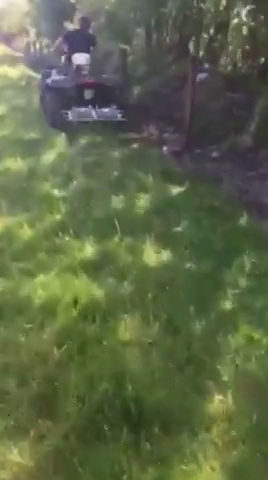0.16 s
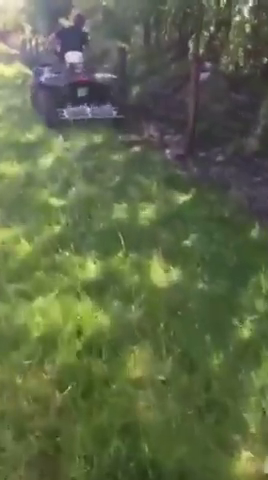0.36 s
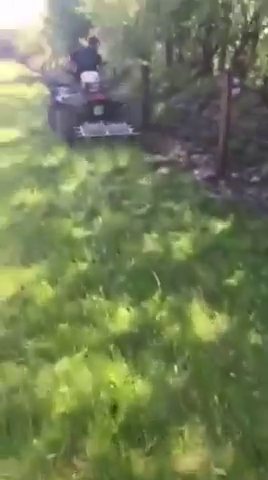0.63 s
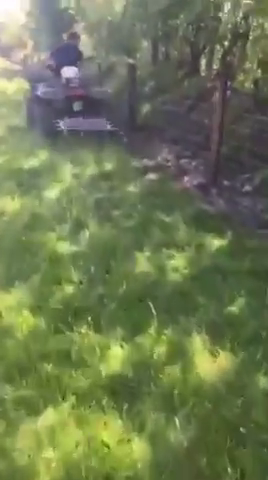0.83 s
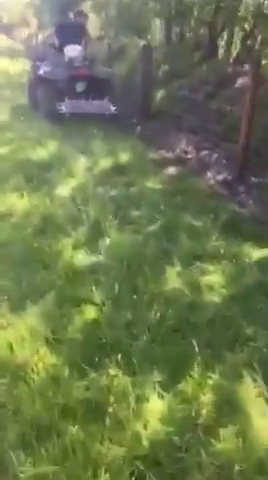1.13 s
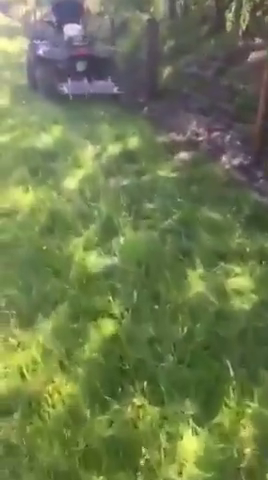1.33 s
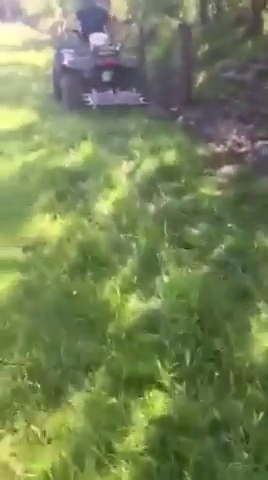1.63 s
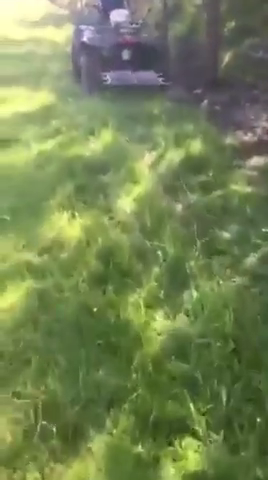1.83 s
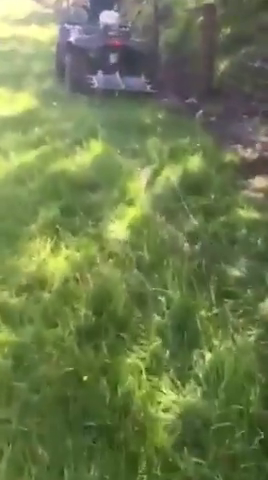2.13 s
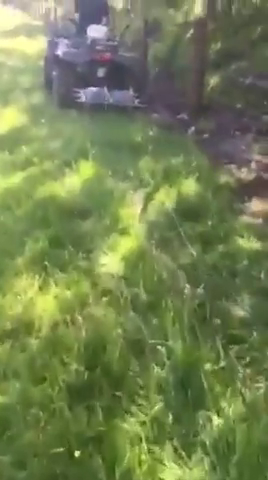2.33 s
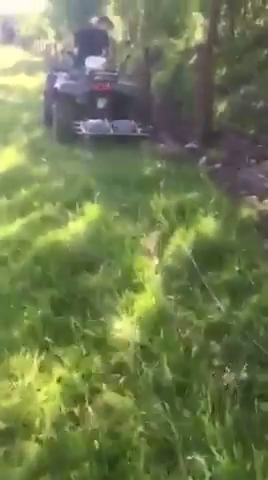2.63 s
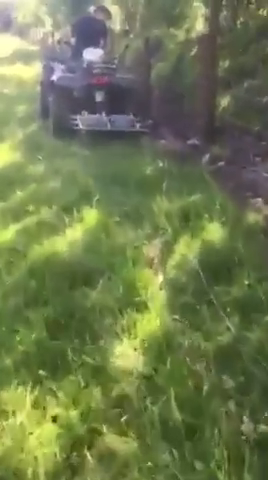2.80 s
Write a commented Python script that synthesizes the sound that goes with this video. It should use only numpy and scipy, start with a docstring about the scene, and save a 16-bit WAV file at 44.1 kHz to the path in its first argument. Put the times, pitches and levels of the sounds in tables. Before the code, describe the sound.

Outdoors, a single-cylinder quad bike drops from a buzzing drone to a loping idle and picks up a little near the end. Its loose steel frame clatters on bumps, with soft wind rumble; mono, dull above the mid-treble.

```python
"""A single-cylinder four-stroke quad bike slows to an uneven idle in a field, then picks up a little.
Each exhaust stroke sings in the pipe and sets silencer modes booming and bark modes ringing; at speed
the strokes merge into a drone, a sum of orders of the firing rate. A steel frame rattles in bursts as
jolts send swarms of touches into its modes, with two echoes; wind and hiss of filtered noise lie below."""
import sys
import numpy as np
from scipy import signal
from scipy.io import wavfile
from scipy.ndimage import uniform_filter1d

SR = 44100
rng = np.random.default_rng(int(sys.argv[2]) if len(sys.argv) > 2 else 0)


def voltage_ratio(level):
    """Linear amplitude factor for a level in decibels (scalar or array-like)."""
    return 10 ** (np.asarray(level, float) / 20)


def unload_wav(signal):
    """Save mono or channel-first audio to the path in sys.argv[1] as 16-bit WAV at rate SR, clipped to [-1, 1]."""
    wavfile.write(
        sys.argv[1],
        SR,
        np.round(np.clip(np.atleast_2d(signal).T, -1, 1) * 32767).astype(np.int16),
    )


N = 130536

# Firing rate of the engine: (time [s], firing rate [firings per s])
FIRING_RATE = [(0.0, 19.5), (0.2, 18.5), (0.3, 17.53), (0.42, 17.03), (0.62, 17.89), (0.8, 16.23),
               (1.05, 14.66), (1.3, 11.97), (1.45, 10.33), (1.75, 9.87), (2.0, 8.72), (2.2, 7.58),
               (2.45, 9.13), (2.65, 11.01), (2.96, 12.0)]
# Jolts of the frame, sudden or swelling; treble and low are relative to the peak:
# (time [s], relative peak [dB], rise [s], fall t60 [s], treble before a common 3 dB lift [dB], low [dB])
FRAME_JOLTS = [(.0014,-20.5,0.0053,0.54,-8.5,3),(0.0732,-20.5,0.0054,0.68,-5,3.5),(0.0936,-14.5,.011,0.32,-11,1),(0.1514,-16.5,0.022,0.07,-17,2.5),
               (0.1914,-21.5,0.009,0.25,-6.5,2),(0.2332,-19,.018,.38,-5,-1),(0.2822,-18.5,0.0027,0.4,-6,6),(0.3713,-13,0.0044,0.32,-7,1),
               (.3844,-23,.0085,0.27,-8.5,0),(.4294,-16.5,0.035,0.77,-12,-0.5),(0.4778,-25,0.063,.1,0,0),(0.5267,-19.5,0.0056,0.086,-14,-3),
               (0.6772,-12.5,0.003,.1,-6,-4),(0.682,-9.5,0.021,0.31,-4.5,0.5),(0.8258,-16.5,0.0048,0.26,-7,2.5),(0.8424,-16.5,0.012,0.37,-10,0),
               (0.9446,-22,0.0049,.6,-13,0),(0.9816,-11.5,0.0064,0.14,-10.5,-4.5),(1.0054,-13,0.012,0.3,-7,1.5),(1.0374,-21,0.014,0.23,-4,0.5),
               (1.0705,-27,0.02,0.54,-7,-4),(1.1486,-24,0.012,0.68,-13,-2.5),(1.1974,-24,0.011,0.71,-8,-0.5),(1.2274,-20.5,0.0059,0.38,-7.5,0.5),
               (1.2983,-23,.011,.73,-6.5,-3.5),(1.378,-20,0.014,0.17,-8.5,4),(1.3922,-15.5,0.0062,0.13,-4.5,-6),(1.441,-23.5,0.028,0.54,-9,-7),
               (1.5006,-16,.008,0.23,-4.5,2.5),(1.5202,-17.5,0.007,0.43,-10.5,2),(1.643,-20,0.023,0.4,-11,-1),(1.8329,-32,0.0072,0.42,-17.5,8),
               (1.9217,-32.5,0.0069,1,-9.5,3),(1.9544,-27.5,0.02,0.26,-25,1.5),(2.048,-21,0.0072,0.63,-13,1),(2.063,-14,0.024,0.37,-11,-4),
               (2.1068,-8.5,0.014,0.13,-8,-2.5),(2.1694,-26.5,0.021,0.27,-14,1),(2.215,-24.5,0.018,0.045,-9,0.5),(2.3152,-31,0.0049,0.13,-16,7.5),
               (2.3448,-29.5,0.0029,0.32,-17,5),(2.4336,-31.5,.004,0.2,-15.5,7),(2.4635,-21,0.0019,0.064,-23.5,-2),(2.5128,-32.5,0.0037,0.17,-13.5,4.5),
               (2.5387,-27,0.0049,0.15,-18.5,0.5),(2.5593,-28.5,.004,0.44,-12.5,-2),(2.6316,-28,0.01,0.75,-12,3.5),(2.6855,-20,0.0058,.1,-3.5,-1.5),
               (2.6987,-22,0.025,.2,-10,1.5),(2.8063,-33.5,0.0028,.12,-11,6),(2.8285,-21,0.0032,0.055,-21,-5),(2.9002,-28.5,0.0032,0.076,-15.5,7.5),
               (2.9223,-24.5,0.0045,0.075,-16.5,2)]
VALVE_OPENS = -0.4  # share of a cycle, from the firing count's whole numbers


def rms_one(x):
    """Normalisation to unit mean power: scale to rms 1."""
    return x / np.sqrt(np.mean(x ** 2) + 1e-20)


def in_time(rows):
    """Linear interpolation in time: columns of a curve, one value per sample."""
    s, *columns = np.transpose(rows)
    return [np.interp(np.arange(N) / SR, s, c) for c in columns]


def at_hz(points, hz):
    """Interpolation of a level spectrum on a logarithmic frequency axis."""
    point_hz, point_db = np.transpose(points)
    return np.interp(np.log(hz), np.log(point_hz), point_db)


def drift(corner_hz):
    """Low-passed Gaussian noise: two equal poles leave a slow fluctuation of spread 1."""
    pole = np.exp(-2 * np.pi * corner_hz * 40 / SR)  # one value every 40 samples
    noise = rng.standard_normal(N // 40 + 2002)
    slow = signal.lfilter([1], [1, -2 * pole, pole ** 2], noise)[2000:]  # settled part
    return np.interp(np.arange(N) / 40, np.arange(len(slow)), rms_one(slow))


def ring(clicks, hz, t60):
    """Impulse response of a damped resonator: a unit click starts a decaying sine of initial height 1."""
    r, w = voltage_ratio(-60 / (t60 * SR)), 2 * np.pi * hz / SR
    return signal.lfilter([0, np.sin(w)], [1, -2 * r * np.cos(w), r * r], clicks + 1e-18)


def engine(firing_hz):
    """Source and resonator: each stroke excites pipe, silencer and bark modes, over the orders' drone."""
    # Exhaust course; boom level and pipe note are read once a firing, bark level runs on continuously:
    # (time [s], boom level [dB], bark level [dB], pipe note [Hz])
    exhaust = [(0, -41, -41, 72.2), (.08, -38.5, -36.5, 75.3), (.3, -40, -40.5, 67.4),
               (.56, -45, -42, 69.2), (.8, -40, -47, 63.4), (1.085, -37, -40, 60.4),
               (1.16, -47.5, -44.5, 57), (1.316, -45, -42.5, 72), (1.405, -29, -43.5, 88.1),
               (1.5, -32.5, -40, 90), (1.6, -47.5, -42, 81.3), (1.7, -33.5, -45, 76), (1.8, -45.5, -55, 86),
               (1.908, -28, -40, 76), (2.017, -28.5, -44.5, 84.1), (2.14, -44.5, -49.5, 90),
               (2.27, -38.5, -64.5, 81.7), (2.39, -26.5, -43.5, 78.7), (2.5, -24, -40, 81.5),
               (2.6, -25, -42.5, 89.8), (2.69, -28.5, -42.5, 86.4), (2.78, -28, -40, 82),
               (2.863, -31, -42.5, 90), (2.95, -30.5, -39.5, 90)]
    boom_db, bark_db, pipe_hz = in_time(exhaust)
    cycles = 0.36 + np.cumsum(firing_hz) / SR
    luck = rng.standard_normal((64, 20))  # one row a stroke
    turn = np.floor(cycles - VALVE_OPENS).astype(int)
    fired = np.minimum(np.searchsorted(cycles, turn), N - 1)
    boom_db = uniform_filter1d(boom_db[fired], size=300)
    share, sings, valve = exhaust_valve(cycles, turn, firing_hz)
    pipe = exhaust_pipe(turn, share / sings, valve, boom_db, pipe_hz[fired], luck)
    boom = voltage_ratio(-3) * pipe + silencer(cycles, firing_hz, luck)
    return voltage_ratio(boom_db) * rms_one(boom) + voltage_ratio(bark_db) * bark(cycles, valve, luck) + drone(cycles)


def exhaust_valve(cycles, turn, firing_hz):
    """Periodic gating: the singing time is constant at idle and a fixed share of the cycle at speed."""
    edge = 0.16  # share of a cycle to open or shut
    share = cycles - VALVE_OPENS - turn
    sings = np.minimum(0.053 * firing_hz, 0.68)  # 0.053 s, at most 0.68 of a cycle
    nearest_edge = np.minimum(share, sings + edge - share)
    valve = np.sin(np.pi / 2 * np.clip(nearest_edge / edge, 0, 1)) ** 2
    return share, sings, valve


def exhaust_pipe(turn, progress, valve, boom_db, pipe_hz, luck):
    """Forced and free vibration: a tone and its octave sing under the open valve, and a mode rings on."""
    uneven_db, swell_db, overtone_db = 1, 8, -12.5
    phase = np.cumsum(pipe_hz) / SR
    opening = np.diff(turn, prepend=-1) > 0
    opened = np.maximum.accumulate(np.where(opening, phase, 0))
    angle = 2 * np.pi * (phase - opened)  # restarts at each opening
    tone = np.sin(angle) - voltage_ratio(overtone_db) * np.cos(2 * angle)
    pipe = valve * voltage_ratio(uneven_db * luck[turn, 0] + swell_db * progress) * tone
    # the drive carries the boom level, so the tail keeps the strength of its own stroke
    ring_on = ring(pipe * voltage_ratio(boom_db), 86, 0.34) / voltage_ratio(boom_db)
    return pipe + voltage_ratio(-11.5) * np.std(pipe) * rms_one(ring_on)


def stroke_pulses(cycles, at, stroke_luck):
    """Impulsive excitation: one click a cycle at a given share of it, its height spread by 2 dB."""
    turn = np.floor(cycles - at).astype(int)
    return np.diff(turn, prepend=turn[0]) * voltage_ratio(2 * stroke_luck[turn + 2])


def silencer(cycles, firing_hz, luck):
    """Modal superposition: the opening valve strikes low resonances, which boom more at speed."""
    # Silencer modes: (frequency [Hz], relative level [dB], t60 [s])
    silencer_modes = [(51, 7, 0.28), (42.4, -6, 0.17), (90, 9.5, 0.25)]
    out = 0
    for k, (hz, db, t60) in enumerate(silencer_modes):
        out = out + voltage_ratio(db) * ring(stroke_pulses(cycles, VALVE_OPENS, luck[:, 1 + k]), hz, t60)
    return out * voltage_ratio(1.53 * (firing_hz - 16.5))  # dB per firing Hz


def bark(cycles, valve, luck):
    """Modal superposition: a pulse, an inverted afterpulse and gas noise excite brighter modes; rms 1."""
    # Bark modes: (frequency [Hz], relative level [dB], t60 [s])
    bark_modes = [(138.4, 1.5, 0.06), (185.6, 5.5, 0.074), (239, -15, 0.03), (273.3, -6.5, 0.052),
                  (294, -10.5, 0.044), (418.7, -9.5, 0.099), (593, -16, 0.069), (666.6, -5.5, 0.11)]
    starts, stagger, after_at = -0.118, 0.02013, 0.4  # shares of a cycle; stagger is between modes
    gas = voltage_ratio(-9) * rng.standard_normal(N) * np.sqrt(12 / SR) * (valve + 0.3)
    out = 0
    for k, (hz, db, t60) in enumerate(bark_modes):
        first = stroke_pulses(cycles, starts + stagger * k, luck[:, 4 + k])
        after = voltage_ratio(-3.5) * stroke_pulses(cycles, after_at, luck[:, 12 + k])
        out = out + (-1) ** k * voltage_ratio(db) * ring(first - after + gas, hz, t60)
    return rms_one(signal.sosfilt(signal.butter(2, 375, fs=SR, output="sos"), out))


def drone(cycles):
    """Fourier synthesis: orders of the firing rate, each wavering a little in level and phase."""
    # Orders {multiple of the firing rate: rms before the level course [dB]}
    orders = {3: -33, 4: -36, 5: -39.5, 6: -51.5, 7: -41, 8: -43.5, 9: -48, 10: -46.5, 11: -37, 12: -44, 13:
              -49.5, 14: -48, 15: -41.5, 16: -45, 17: -54.5, 18: -54.5, 19: -57}
    # Level course: (time [s], third order [dB], fourth and fifth [dB], higher orders [dB])
    course = [(0, 0, 0, -0.5), (.3, -4, 2, 0), (.42, 1.5, 2.5, 0), (.53, -15, 9, 1.5), (.65, 1, 4, 1),
              (.76, -10, 0, -1), (.89, -4.5, 3.5, -2.5), (1.02, -8.5, 0, -5), (1.16, -13, -20, -14.5),
              (1.3, -20, -17, -15), (1.5, -39, -37, -37)]
    # Silencer resonances turn these orders ahead of the stroke: {order: phase lead [rad]}
    lead = {3: 1, 5: 2.2, 10: 1, 12: .6, 13: 4, 16: 1}
    levels = in_time(course)
    out = 0
    for k, db in orders.items():
        level_db = db + levels[min(k // 2 - 1, 2)] + 1.2 * drift(10)
        phase = 2 * np.pi * k * cycles - 2.1 + lead.get(k, 0) + 0.15 * drift(7.4)
        out = out + np.sqrt(2) * voltage_ratio(level_db) * np.cos(phase)
    return out


def jolt_envelopes():
    """Energy addition: powers of linear rises and exponential falls add; sudden jolts also click."""
    t = np.arange(N) / SR
    shake, treble, low, first = np.zeros((4, N))
    for s, db, rise, fall, treble_db, low_db in FRAME_JOLTS:
        since = np.maximum(t - s, 0)
        shape = voltage_ratio(db) * np.minimum(since / rise, 1) * voltage_ratio(-60 * np.maximum(since - rise, 0) / fall)
        shake = shake + shape ** 2
        treble = treble + (shape * voltage_ratio(treble_db)) ** 2
        low = low + (shape * voltage_ratio(low_db)) ** 2
        first[int(s * SR) + 20] = voltage_ratio(6 + db) * (rise < 0.012)
    return shake, 2 * treble, low, first


def loose_touches():
    """Random point process: about 1800 touches per s, clumped, of uneven size and random sign."""
    spread_db = 4.5 * np.minimum(rng.exponential(1, N), 3)
    sizes = voltage_ratio(spread_db) * rng.choice([-1, 1], N)
    touches = sizes * (rng.random(N) < 1800 * voltage_ratio(2.5 * drift(40)) / SR)
    # the power of 1000 unit touches per s
    return touches / np.sqrt(np.mean(touches ** 2) * SR / 1000), np.sign(sizes)


def frame_modes():
    """Modal density: a few frame modes stand among 70 log-spaced small ones shaped to a spectrum."""
    # Ringing parts of the frame: (frequency [Hz], t60 [s], relative level [dB])
    parts = [(1136,0.058,-6.5),(1626,0.092,-2),(2480,0.21,-8.5),(2604,0.11,4),(2896,0.081,-1),(3372,0.26,-3),(4690,0.067,4),
             (4924,0.085,10),(5350,0.079,3),(5760,0.16,2.5),(5800,.08,3.5),(6060,0.11,-7.5),(7050,0.14,6),(7330,.06,6.5)]
    # Spectrum of many small loose parts: (frequency [Hz], relative level [dB per Hz])
    links = [(350, -42), (600, -22.5), (1120, -9.5), (1630, -9.5), (2280, -10), (2980, -2), (3550, -9.5),
             (5130, -4), (7100, -4), (8000, 1), (10400, -48.5), (17600, -120)]
    small = np.geomspace(780, 7900, 70) * rng.uniform(0.98, 1.02, 70)
    modes = [(hz, -8 + db, t60) for hz, t60, db in parts]
    # log-spaced modes each cover a band that widens with frequency
    modes += [(hz, -1.5 + at_hz(links, hz) + 10 * np.log10(hz / 3000), 0.036) for hz in small]
    return modes


def rattle():
    """Impact excitation of modes: each jolt shakes out a swarm of touches with a colour of its own."""
    shake, treble, low, first = jolt_envelopes()
    touches, signs = loose_touches()
    modes = frame_modes()
    jolt = np.searchsorted(np.sort(np.array(FRAME_JOLTS)[:, 0]), np.arange(N) / SR)
    colour = voltage_ratio(3 * rng.standard_normal((len(FRAME_JOLTS) + 1, len(modes))))
    later_shake = np.roll(shake, -150)
    out = 0
    for k, (hz, db, t60) in enumerate(modes):
        down = np.interp(hz, [1700, 2600], [1, 0])
        up = np.interp(hz, [2970, 4300], [0, 1]) ** 0.5
        strength = np.sqrt(shake + down * (low - shake) + up * (treble - shake))
        swarm = touches * np.roll(signs, 7 * k + 1) * strength  # signs differ between modes
        # the first touch takes its tone from the jolt 150 samples on
        tone = np.roll(strength, -150) / np.sqrt(later_shake + 1e-12)
        hits = swarm + first * np.sign(colour[jolt, k] - 1) * tone
        # longer rings start softer, for equal energy
        out = out + voltage_ratio(db) * np.sqrt(0.039 / t60) * ring(hits * colour[jolt, k], hz, t60)
    return voltage_ratio(-22.5) * signal.sosfilt(signal.butter(3, 650, "high", fs=SR, output="sos"), out)


def outdoor_echoes(frame):
    """Specular reflection: ground and hedge return delayed, weaker copies of the rattle."""
    # Reflections: (delay [s], level [dB])
    reflections = [(.006, -12.5), (.021, -14)]
    return sum(voltage_ratio(db) * np.r_[np.zeros(int(s * SR)), frame][:N] for s, db in reflections)


def air(spectrum):
    """Subtractive synthesis: half-octave bands of noise, each flickering by 0.5 dB; rms 1."""
    edges = 25 * 2 ** np.arange(0, 8.6, 0.5)
    white = rng.standard_normal((2, N))  # neighbouring bands use different noises
    out = 0
    for k, (low, high) in enumerate(zip(edges, edges[1:])):
        band = signal.sosfilt(signal.butter(2, [low, high], "band", fs=SR, output="sos"), white[k % 2])
        out = out + voltage_ratio(at_hz(spectrum, np.sqrt(low * high)) + 0.5 * drift(24)) * band
    return rms_one(out)


def wind(firing_hz):
    """Broadband noise: a low-pitched spectrum whose level follows the firing rate."""
    # Wind spectrum: (frequency [Hz], relative level [dB per Hz])
    wind_spectrum = [(24, -43.5), (40, 0.5), (86, -2), (192, -5.5), (299, -15), (519, -27), (700, -24.5),
                     (910, -75.5), (1540, -120)]
    return voltage_ratio(-38 + 0.47 * (firing_hz - firing_hz.mean())) * air(wind_spectrum)  # dB per firing Hz


def grass_hiss():
    """Broadband noise: a higher spectrum under a level that falls with time."""
    # Hiss spectrum: (frequency [Hz], relative level [dB per Hz])
    hiss_spectrum = [(350, -32), (600, -5.5), (1140, 0.5), (2160, 1), (2920, -13), (3550, -1), (7180, -9.5),
                     (8000, -22), (10400, -56), (17600, -120)]
    # Hiss course: (time [s], level [dB])
    hiss_level = [(0, -39), (.62, -43), (1.39, -43), (1.76, -53), (2.3, -54), (2.96, -54)]
    return voltage_ratio(in_time(hiss_level)[0]) * air(hiss_spectrum)


def scene():
    """Linear superposition of engine, rattle, its echoes, wind and hiss."""
    firing_hz = in_time(FIRING_RATE)[0]
    frame = rattle()
    mix = engine(firing_hz) + frame + outdoor_echoes(frame) + wind(firing_hz) + grass_hiss()
    return mix[None]


def roll_off(x):
    """The treble ends steeply here."""
    return signal.sosfilt(signal.butter(12, 8660, fs=SR, output="sos"), x)


def record(dry):
    """Band limitation: a steep low-pass and a gentler high-pass bound the spectrum."""
    x = signal.sosfilt(signal.cheby2(10, 70, 7750 * 1.19, fs=SR, output="sos"), dry)  # stopband edge
    x = signal.sosfilt(signal.butter(3, 20.7, "high", fs=SR, output="sos"), x)
    return roll_off(x)


dry = scene()
out = record(dry)
unload_wav(out)
```